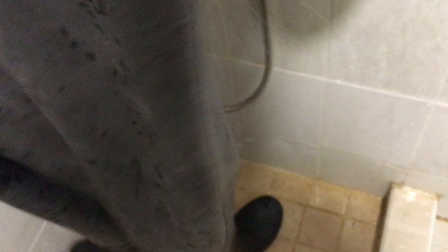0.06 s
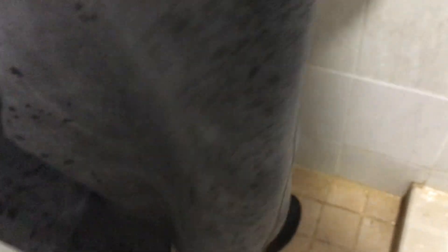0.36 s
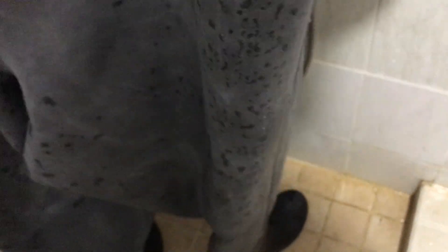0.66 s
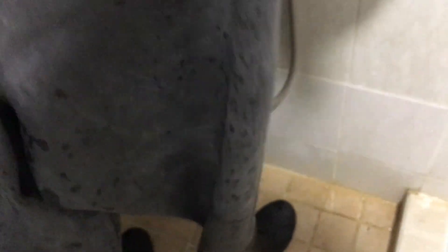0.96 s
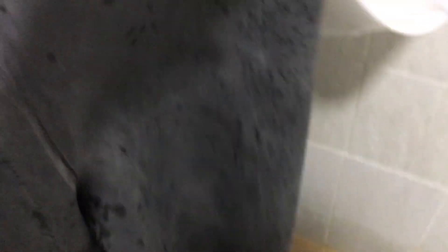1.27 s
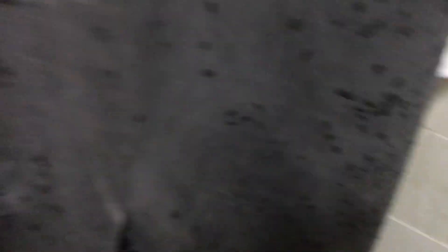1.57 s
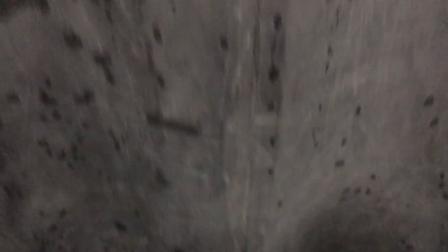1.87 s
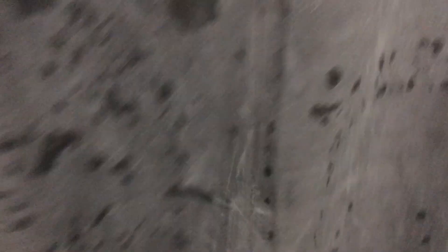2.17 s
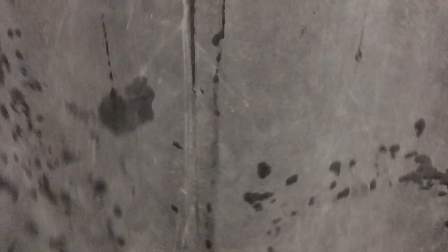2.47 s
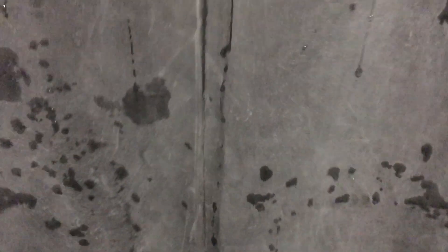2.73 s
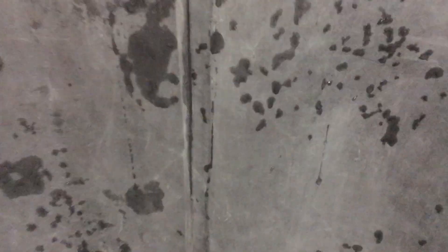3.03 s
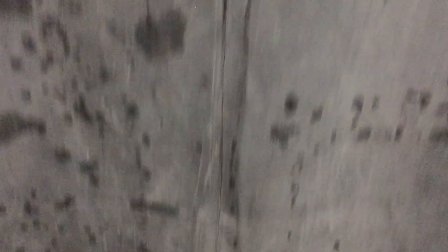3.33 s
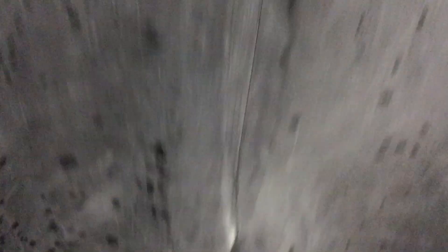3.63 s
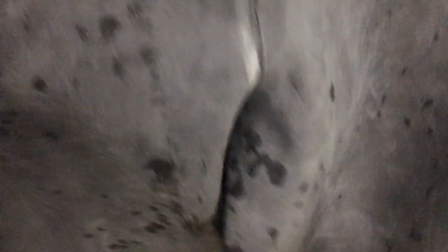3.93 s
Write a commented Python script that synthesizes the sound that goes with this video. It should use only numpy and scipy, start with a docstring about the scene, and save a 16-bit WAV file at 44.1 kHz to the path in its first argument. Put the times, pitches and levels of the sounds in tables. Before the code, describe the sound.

A heavy rubber garment is handled close by, starting with its loudest low wobbles, dull plops and crease snaps during the first half second. Softer rubbing and hissing slides follow, with a short judder near 1 second. From 2.1 to 2.6 seconds come more snaps and thuds. It then goes almost still until folds thump again from 3.6 to 4 seconds. The quiet tiled room adds a short echo.

```python
"""Turning a heavy rubber suit

A heavy rubber suit is turned over by hand, close by, in a small quiet tiled room.
The sheet wobbles in many soft flexes, and rubber slides over rubber in tiny slips that hiss and rasp.
Folds buckle with dull falling plops, and creases snap with a click and a thud.
The tiles answer with a short bright tail and a few low resonances."""
import sys
import numpy as np
from scipy import signal
from scipy.fft import rfft, irfft
from scipy.io import wavfile
from scipy.ndimage import uniform_filter1d

SR = 44100
rng = np.random.default_rng(int(sys.argv[2]) if len(sys.argv) > 2 else 0)


def transcribe(u):
    """Save the signal u as a 16-bit wav file named by the first command-line argument.

    u: samples, shape (n,) or (channels, n), limited to [-1, 1]; the rate is SR.
    q: integer samples, one column per channel.
    """
    v = np.clip(np.atleast_2d(u).T, -1, 1)
    q = np.round(v * 32767).astype(np.int16)
    wavfile.write(sys.argv[1], SR, q)


N = 176400
T = np.arange(N) / SR


def from_db(db):
    """Decibels to gain."""
    return 10 ** (np.asarray(db) / 20)


def rms_one(x):
    """Scale to unit power."""
    return x / np.sqrt(np.mean(x ** 2) + 1e-20)


def at_hz(points, hz):
    """Read a curve on a log-frequency axis."""
    freqs, values = np.transpose(points)
    return np.interp(np.log(np.maximum(hz, 1)), np.log(freqs), values)


def fader(points):
    """Gain riding along points of time_s, level_db."""
    return from_db(np.interp(T, *np.transpose(points)))


def colour(x, eq):
    """Shape a signal with a smooth EQ curve; unit power."""
    gain = from_db(at_hz(eq, np.fft.rfftfreq(N, 1 / SR)))
    return rms_one(irfft(rfft(x) * gain, N))


def pass_filter(x, hz, kind, order=2):
    """Causal low-, high- or band-pass."""
    return signal.sosfilt(signal.butter(order, hz, kind, fs=SR, output="sos"), x)


def resonator(x, hz, width_hz):
    """One resonant band, at unity gain in its centre."""
    return signal.lfilter(*signal.iirpeak(hz, hz / width_hz, fs=SR), x)


def ring(x, modes):
    """Parallel resonances."""
    return sum(from_db(db) * resonator(x, hz, width_hz) for hz, width_hz, db in modes)


def grains(per_s, spread_db):
    """Random clicks of uneven size."""
    clicks = (rng.random(N) < per_s / SR) * rng.choice([-1, 1], N)
    return clicks * from_db(spread_db * np.minimum(rng.exponential(1, N), 4))


def swell(peak_s, rise_s, fall_s):
    """A bell-shaped stroke with its own rise and fall."""
    return np.exp(-.5 * ((T - peak_s) / np.where(T < peak_s, rise_s, fall_s)) ** 2)


def add(out, start_s, x):
    """Mix a sound in at a given time."""
    i = int(np.clip(start_s * SR, 0, N - 1))
    out[i:i + len(x)] += x[:N - i]


# Tone of the still air: freq_hz, gain_db
AIR_EQ = [(20, -23), (55, 8.5), (120, -6), (330, -5.5), (520, -12), (1200, -23.5), (3500, -25.5),
          (6000, -29.5), (15500, -34.5)]

def room_tone():
    """Still air: a faint, bass-heavy bed of noise."""
    return from_db(-66.5) * colour(rng.standard_normal(N), AIR_EQ)


# Time for the reverb to fall 60 dB: freq_hz, decay_s
REVERB_DECAY = [(100, 0.73), (500, 0.35), (2000, 0.39), (6000, 0.3), (15000, 0.84)]
# Tone of the reverb: freq_hz, gain_db
REVERB_EQ = [(60, -5), (250, 12), (700, 7), (2000, 2), (6000, -2.5), (15000, 4.5)]
# Ring between the tiles: pitch_hz, width_hz, gain_db
TILE_MODES = [(648, 26, 0), (1618, 94, -14), (2290, 160, -1), (3620, 1350, -4.5), (5760, 200, -5)]
PREDELAY_S, EARLY_DB, EARLY_FADE_S = 0.00387, 10, 0.0065

def tile_reverb(x):
    """Dense reflections, strongest at first, lingering longest in the bass and the very top."""
    t = T[:SR // 2]
    tail, edges_hz = 0, np.geomspace(50, 18000, 13)
    for low, high in zip(edges_hz, edges_hz[1:]):
        hz = np.sqrt(low * high)
        band = rms_one(pass_filter(rng.standard_normal(len(t)), [low, high], "band"))
        envelope = from_db(at_hz(REVERB_EQ, hz) - 60 * t / at_hz(REVERB_DECAY, hz))
        tail = tail + band * np.sqrt(high - low) * envelope
    early_lift = 1 + from_db(EARLY_DB) * np.exp(-t / EARLY_FADE_S)
    tail = tail * (t > PREDELAY_S) * early_lift
    tail = tail + ring(tail, TILE_MODES)
    return signal.fftconvolve(x, tail / np.sqrt(np.sum(tail ** 2)))[:N]


# Resonances of the brushed skin: pitch_hz, width_hz, gain_db
SKIN_MODES = [(2550, 300, -3), (3700, 450, 0), (5600, 600, -3)]

def skin(x):
    """Friction noise picks up the resonances of the rubber skin; unit power."""
    return rms_one(x + ring(x, SKIN_MODES))


# Fader ride of the sliding surface, before trim: time_s, level_db
SLIDE_RIDE = [(0.0, -52.5), (0.17, -74), (0.58, -56.5), (0.77, -61), (1.22, -61), (1.67, -60), (1.76, -61),
              (1.88, -62.5), (2.16, -74), (2.35, -67), (2.91, -69.5), (3.04, -76), (3.42, -67.5),
              (3.85, -65), (4.0, -63)]
# Tone of its hiss: freq_hz, gain_db
SLIDE_EQ = [(1000, 8), (2300, 0.5), (4500, 1), (6500, 1), (9500, 0.5), (11500, -4), (16000, -7)]

def sliding(trim_db=-8.5):
    """Rubber glides over rubber with a smooth hiss."""
    hiss = skin(colour(rng.standard_normal(N), SLIDE_EQ))
    return hiss * fader(SLIDE_RIDE) * from_db(trim_db)


# Fader ride of the rubbing folds, before trim: time_s, level_db
RUB_RIDE = [(0, -49), (0.1, -67), (0.16, -55), (0.29, -54), (0.36, -44.5), (0.47, -52), (0.6, -62.5),
            (0.76, -58.5), (0.84, -70), (0.94, -53), (1.08, -56.5), (1.3, -67), (1.53, -60), (1.75, -67.5),
            (2.0, -73), (2.26, -64.5), (2.33, -61), (2.5, -58.5), (2.68, -66), (3.1, -76), (3.6, -75),
            (3.7, -61.5), (3.84, -63.5), (4, -55)]
# Tone of the rub: freq_hz, gain_db
RUB_EQ = [(200, 6), (450, 0), (900, -2.5), (1500, -3.5), (2500, -11.5), (5000, -19.5), (10000, -43),
          (16000, -60)]

def rubbing(trim_db=1, flutter_db=2):
    """Tiny slips between the folds merge into a fluttering rub, washed by the tiles."""
    slips = grains(per_s=1200, spread_db=1.5)
    flutter = rms_one(pass_filter(rng.standard_normal(N), 25, "low"))
    slips = slips * from_db(flutter_db * flutter)
    return colour(slips + tile_reverb(slips), RUB_EQ) * fader(RUB_RIDE) * from_db(trim_db)


# Quick brush strokes: peak_s, rise_s, fall_s, fizz_db, rasp_db
BRUSHES = [(0.065, 0.027, 0.069, -65, -60.5), (0.28, 0.046, 0.069, -60.5, -60.5),
           (0.979, 0.033, 0.018, -59, -75), (1.06, 0.0091, 0.017, -72, -72),
           (1.182, 0.0076, 0.01, -65, -86), (1.58, 0.12, 0.071, -66, -66), (1.865, 0.062, 0.033, -66, -59),
           (2.132, 0.016, 0.027, -78, -56.5), (2.72, 0.021, 0.013, -77, -93), (2.88, 0.033, 0.14, -81, -84),
           (3.03, 0.036, 0.022, -76.5, -88), (3.77, .012, 0.013, -67.5, -69),
           (3.945, 0.021, 0.014, -87, -63)]
# Airy top of a stroke: freq_hz, gain_db
FIZZ_EQ = [(3000, 2), (6000, 11), (9000, 13), (12000, 8.5), (15500, 8)]
# Midrange bite of a stroke: freq_hz, gain_db
RASP_EQ = [(700, -2), (1800, 1), (3500, -1), (5000, -2.5), (9000, -8), (16000, -21)]

def brushes():
    """Fast strokes of rubber on rubber: fine fizz over a coarser rasp."""
    fizz = colour(grains(per_s=14000, spread_db=1.7), FIZZ_EQ)
    rasp = skin(colour(grains(per_s=5000, spread_db=1.6), RASP_EQ))
    return sum(swell(*timing) * (from_db(fizz_db) * fizz + from_db(rasp_db) * rasp)
               for *timing, fizz_db, rasp_db in BRUSHES)


# A fold drags and judders: peak_s, rise_s, fall_s, level_db
DRAGS = [(0.085, 0.03, 0.034, -52.5), (0.209, 0.023, .03, -52), (0.976, 0.025, 0.015, -46),
         (1.215, 0.041, 0.059, -56.5), (2.134, 0.02, 0.035, -52.5), (2.57, 0.034, .04, -61),
         (3.945, 0.023, 0.0076, -60)]
# Tone of the judder: freq_hz, gain_db
DRAG_EQ = [(300, 1), (600, -14.5), (1000, -0.5), (1500, -2.5), (2200, -5), (4000, -17.5), (9000, -29)]
# Hollow of the fold: pitch_hz, width_hz, gain_db
FOLD_MODES = [(690, 89, 13), (930, 120, 3), (980, 71, -5)]

def drags():
    """Gripping rubber lets go in a run of dull slips that sound the hollow of the fold."""
    slips = colour(grains(per_s=1100, spread_db=0.98), DRAG_EQ)
    strokes = sum(from_db(db) * swell(*timing) for *timing, db in DRAGS)
    return rms_one(slips + ring(slips, FOLD_MODES)) * strokes


# Fader rides as the sheet is lifted, turned and spread, before trim: time_s, level_db
LIFT_RIDE = [(0, -48.5), (0.035, -53), (0.06, -37.5), (0.15, -41.5), (0.225, -35.5), (0.295, -49.5),
             (0.335, -32), (0.39, -32.5), (0.45, -62), (0.485, -39), (0.65, -54.5), (0.76, -44.5),
             (0.835, -59), (0.86, -46)]
TURN_RIDE = [(0.87, -44.5), (1.018, -52), (1.048, -51), (1.238, -46.5), (1.332, -53.5), (1.446, -46),
             (1.628, -60), (1.898, -51), (1.916, -52), (2.04, -60)]
SPREAD_RIDE = [(2.06, -68), (2.076, -48), (2.112, -37.5), (2.246, -68), (2.391, -35), (2.434, -50),
               (2.466, -40), (2.552, -53.5), (2.626, -45), (2.856, -69.5), (2.883, -53), (3.172, -71),
               (3.29, -62), (3.45, -91), (3.674, -67), (3.84, -58.5), (3.93, -38.5), (3.98, -50)]
# Bass weight of the sheet: freq_hz, gain_db
WOBBLE_EQ = [(25, -35), (45, 4.5), (90, 1.5), (170, 3), (300, -3), (450, -12.5), (700, -26.5), (1400, -42)]
# Low room resonances, also rung by the buckles: pitch_hz, width_hz, gain_db
ROOM_MODES = [(92, 7.7, 4.5), (170, 13.3, 8.5), (302.1, 18.7, 6), (426, 24.5, 0), (526, 15, -3),
              (665, 24, -1), (928, 29, 2.5)]

def wobble(trim_db=-4.5):
    """Many soft flexes of the heavy hanging sheet, louder the more it is moved."""
    flexes = colour(grains(per_s=230, spread_db=2.5), WOBBLE_EQ)
    flexes = flexes + ring(flexes, ROOM_MODES)
    levelled = flexes / np.sqrt(uniform_filter1d(flexes ** 2, size=1300) + 1e-9)  # 30 ms window
    return levelled * fader([*LIFT_RIDE, *TURN_RIDE, *SPREAD_RIDE]) * from_db(trim_db)


PLOP_ROUGHNESS, PLOP_ATTACK_CYCLES = 0.45, 0.82

def plop(first_hz, last_hz, glide_s, fade_s, roughness=PLOP_ROUGHNESS):
    """A bending wave in the sheet: high pitches arrive first, then it sinks and dies."""
    t = T[:SR // 4]
    pitch_hz = last_hz + (first_hz - last_hz) * np.exp(-t / glide_s)
    tone = np.sin(2 * np.pi * np.cumsum(pitch_hz) / SR)
    flutter = rms_one(pass_filter(rng.standard_normal(len(t)), 180, "low"))
    crumple = (1 + roughness * flutter) / np.hypot(1, roughness)
    attack = 1 - np.exp(-t * first_hz / PLOP_ATTACK_CYCLES)
    return tone * crumple * attack * np.exp(-t / fade_s)


def click(crack, bright_hz):
    """A crack dulled to a given brightness, with the energy of 2.7 ms at unit power."""
    x = pass_filter(crack, bright_hz, "low", order=1)
    x = pass_filter(x, min(4.3 * bright_hz, 9000), "low")
    x = pass_filter(x, 600, "high")
    return x * np.sqrt(0.0027 * SR / np.sum(x ** 2))


# Crease hits: start_s, click_db, bright_hz, thud_db, send_db, send_bright_hz
SNAPS = [(0.01, -54, 1970, -42, -3, 2000), (0.3796, -46, 6000, -55, 5, 3060),
         (0.382, -33.5, 1104, -44, -1.5, 1500), (0.5129, -45, 6000, -36.5, 3.5, 9000),
         (0.623, -60, 700, -63, -6, 1200), (0.7193, -50.5, 1100, -61, 4, 2220),
         (0.8587, -49, 1720, -40, -15, 2000), (0.9196, -47.5, 1010, -37, -9, 1200),
         (1.1677, -49.5, 790, -61, -9, 900), (1.483, -55, 400, -49.5, -2, 800),
         (1.734, -52.5, 1000, -43, -6, 1700), (2.0779, -53.5, 3800, -43, -0.5, 3000),
         (2.108, -45, 2590, -34, 4, 1990), (2.119, -56.5, 1190, -51, 13, 2200),
         (2.339, -48, 3360, -35.5, 0.5, 3400), (2.375, -48, 4900, -32.5, 8.5, 1680),
         (2.4714, -48.5, 3000, -36, 2, 1110), (2.7666, -63.5, 2940, -62, 0, 3000),
         (3.649, -52.5, 1800, -38.5, -3, 1400), (3.688, -65, 600, -46.5, 5.5, 706),
         (3.867, -58, 400, -47, 2.5, 600)]
# Brief ring of a crease: pitch_hz, width_hz, gain_db
CREASE_MODES = [(1760, 450, -1), (2450, 250, -26), (6160, 340, -16.5)]

def snaps(grit=0.23, grit_fade_s=0.00036, thud_send_db=-13):
    """A crease lets go with a click and a thud; tiles and listener each get their own click tone."""
    direct, send, t = np.zeros(N), np.zeros(N), T[:SR // 4]
    for start_s, click_db, bright_hz, thud_db, send_db, send_bright_hz in SNAPS:
        crack = (t == 0) + grit * rng.standard_normal(len(t)) * np.exp(-t / grit_fade_s)
        crack = crack + ring(crack, CREASE_MODES)
        thud = from_db(thud_db) * plop(first_hz=480, last_hz=170, glide_s=0.0056, fade_s=0.0069)
        add(direct, start_s, from_db(click_db) * click(crack, bright_hz) + thud)
        sent_click = from_db(click_db + send_db) * click(crack, send_bright_hz)
        add(send, start_s, sent_click + from_db(thud_send_db) * thud)
    return direct + tile_reverb(send)


# Folds flipping over: start_s, level_db, first_hz, last_hz, glide_s, fade_s
BUCKLES = [(0.0455, -36, 1144, 395, 0.0053, 0.0051), (0.051, -29, 332, 225, 0.0024, 0.017),
           (0.086, -34, 334, 242, 0.0065, 0.014), (0.112, -27, 308, 237, 0.0074, 0.0085),
           (0.102, -31, 141, 92, 0.0075, 0.042), (0.138, -28.5, 197, 98, 0.016, 0.017),
           (0.171, -33, 288, 227, 0.018, 0.016), (0.216, -29, 256, 169, 0.0022, 0.011),
           (0.306, -20.5, 850, 700, 0.0078, 0.0093), (0.3083, -25.5, 570, 261.5, 0.0052, 0.012),
           (0.327, -27, 218, 92, 0.014, 0.0072), (0.368, -26, 170, 132, 0.033, 0.0097),
           (0.473, -37.5, 317, 187.5, 0.011, 0.024), (0.977, -34, 923, 880, 0.0059, 0.0087),
           (0.9853, -35, 690, 311.5, 0.0025, 0.017), (1.24, -38, 782, 428, 0.0042, 0.012),
           (1.909, -40.5, 805, 243, 0.0014, 0.012), (2.119, -35.5, 863, 312, 0.011, 0.0094),
           (2.456, -41, 386, 197, 0.0037, 0.0059), (2.467, -40, 855, 740, 0.003, 0.01),
           (2.61, -51.5, 252, 187, 0.015, 0.037), (2.878, -51.5, 210, 172.3, 0.0052, 0.013),
           (3.298, -47.5, 264, 124.6, 0.0068, 0.0043), (3.883, -40.5, 120, 59.6, 0.013, 0.021),
           (3.921, -30.5, 270, 87, 0.0075, 0.014), (3.9945, -31, 920, 335, 0.0014, 0.031)]
# Early reflections off the nearest surfaces: delay_s, gain_db
WALL_ECHOES = [(.0047, -16.5), (0.0127, -14.5), (.021, -13.5)]
ROUGH_BELOW_DB, ROUGH_PER_DB = -28, 0.04  # weak folds crumple more than they ring

def buckles(reverb_db=-13.5, boom_db=0.5):
    """Folds flip over, each with a falling plop that the near walls throw back."""
    plops = np.zeros(N)
    for start_s, level_db, first_hz, last_hz, glide_s, fade_s in BUCKLES:
        roughness = PLOP_ROUGHNESS + ROUGH_PER_DB * max(ROUGH_BELOW_DB - level_db, 0)
        wave = from_db(level_db) * plop(first_hz, last_hz, glide_s, fade_s, roughness)
        add(plops, start_s, wave)
        for delay_s, echo_db in WALL_ECHOES:
            add(plops, start_s + delay_s, from_db(echo_db) * wave)
    return plops + from_db(reverb_db) * tile_reverb(plops) + from_db(boom_db) * ring(plops, ROOM_MODES)


def scene():
    """The suit in the still room, in mono."""
    return (room_tone() + wobble() + rubbing() + sliding() + brushes() + drags() + buckles() + snaps())[None]


# Treble dips of the microphone: freq_hz, width_hz, gain_db
MIC_DIPS = [(4890, 160, -6), (7600, 1200, -2.5), (10400, 730, -6)]
LOW_CUT_HZ, HIGH_CUT_HZ = 31.7, 15750

def record(dry):
    """The microphone loses the deep bass and has a few dips in the treble; the top is cut steeply."""
    x = pass_filter(dry, LOW_CUT_HZ, "high")
    for hz, width_hz, db in MIC_DIPS:
        x = x + (from_db(db) - 1) * resonator(x, hz, width_hz)
    return signal.sosfilt(signal.ellip(10, .1, 70, HIGH_CUT_HZ, fs=SR, output="sos"), x)


dry = scene()
out = record(dry)
transcribe(out)
```